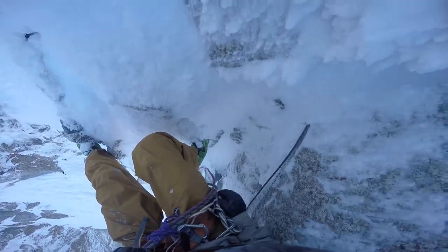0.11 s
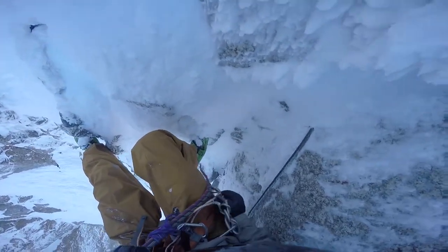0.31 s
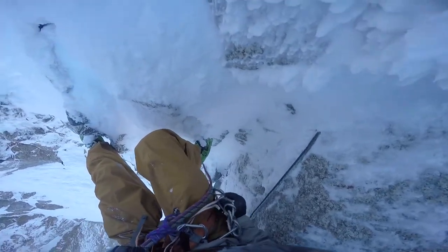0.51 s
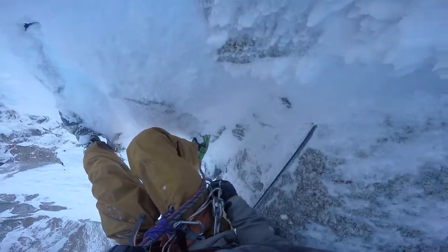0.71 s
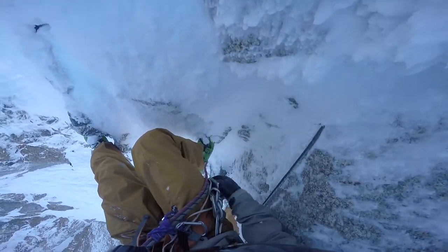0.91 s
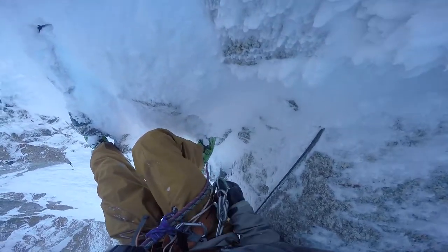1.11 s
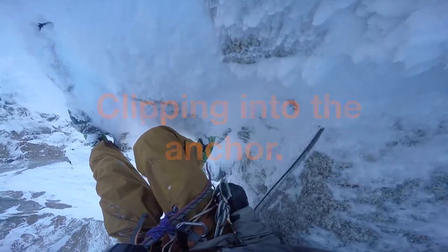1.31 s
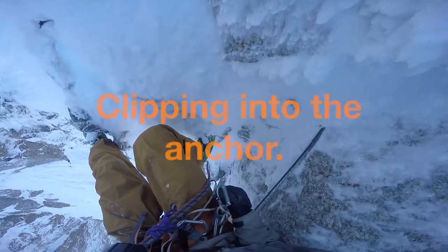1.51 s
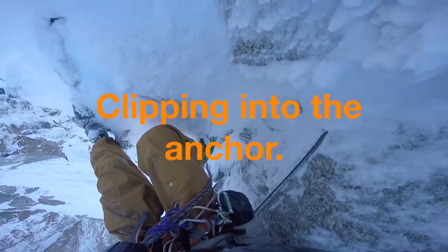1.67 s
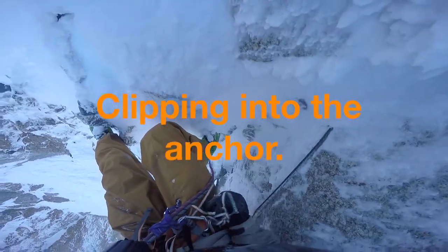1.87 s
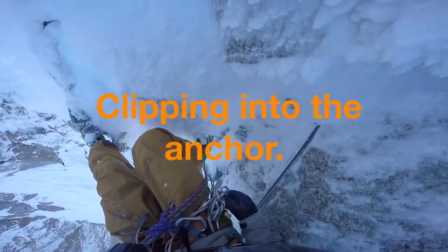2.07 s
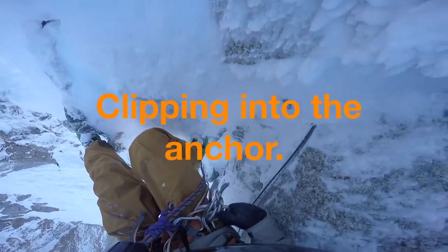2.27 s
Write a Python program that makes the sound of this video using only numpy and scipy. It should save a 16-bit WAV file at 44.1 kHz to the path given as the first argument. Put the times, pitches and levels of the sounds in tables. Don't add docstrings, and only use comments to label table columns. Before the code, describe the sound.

Two sharp, distorted blows strike a plastic camera case after a soft knock, with a low thump; then quiet cloth and snow rustle, ice chips tick and metal gear clinks, heard close on a climber's helmet outdoors.

```python
import sys
import numpy as np
from scipy import signal
from scipy.io import wavfile
from scipy.ndimage import uniform_filter1d

SR = 44100
rng = np.random.default_rng(int(sys.argv[2]) if len(sys.argv) > 2 else 0)


def nominal_scale(level):
    x = np.asarray(level, float) / 20
    return 10 ** x


def log_audio(samples):
    frames = np.atleast_2d(samples).T
    limited = np.clip(frames, -1, 1)
    pcm = np.round(limited * 32767).astype(np.int16)
    wavfile.write(sys.argv[1], SR, pcm)


N = 105840
T = np.arange(N) / SR

# start_s, peak_db, contact_s, hardness_hz, latch_db
BLOWS = [
    (0.2206, -13, 0.00084, 2000, -49.5),
    (0.2224, 2, 0.003, 4500, -18),
    (0.2548, -32, .002, 1962, -49),
    (0.2582, 9.5, .0025, 5586, -14.5),
]
# pitch_hz, level_db, fade_60db_s
CASE_TONES = [(542, -6.5, 0.013), (740, -14.5, 0.018), (974, -10, 0.023), (1245, -8.5, 0.026),
              (1500, -7, 0.022), (1750, -4.5, 0.025), (2082, -5, 0.0087), (2691, 5, 0.013),
              (3320, 0.5, 0.0056), (3786, 4.5, 0.0055), (5300, -0.5, 0.0017), (6530, 0, 0.0079),
              (7850, -6, 0.015), (12000, -6.5, 0.0062)]
# pitch_hz, level_db, fade_60db_s
LATCH_TONES = [(2000, -3, .045), (2261, -2, .04), (2850, -4, .026), (4535, 0, .036), (5800, -7, .03)]
# start_s, peak_db, hardness_hz
SOFT_KNOCKS = [
    (.0858, -26, 2400),
    (.0872, -11.5, 2400),
    (.0892, -19.5, 1960),
    (1.3275, -43, 3060),
    (1.9, -41.5, 2470),
    (1.9025, -34, 2000),
    (2.397, -53, 700),
]
# pitch_hz, level_db, fade_60db_s
SHELL_TONES = [(513, -14.5, 0.058), (766, -18.5, 0.045), (998, -4.5, 0.0334), (1270, 0, 0.029),
               (1580, -5, 0.012), (1635, 2, .02), (2002, -16.5, 0.017), (2362, -12.5, 0.018),
               (2560, 0.5, 0.019), (3400, -13.5, .012)]
# start_s, peak_db, hardness_hz
BUCKLE_TAPS = [
    (1.2566, -22.5, 7600),
    (1.2588, -22, 6400),
    (1.263, -30, 2800),
    (1.2685, -42, 1900),
]
# pitch_hz, level_db, fade_60db_s
BUCKLE_TONES = [(348, -12.5, 0.065), (830, -2, 0.028), (558, -33, 0.021), (1020, -2, 0.025),
                (1250, 15.5, 0.013), (1540, 1, 0.018), (1960, -2, 0.056), (2400, 12.5, 0.014),
                (2640, -24, 0.025), (3600, -33, .014)]
# pitch_hz, level_db, fade_60db_s
MOUNT_TONES = [(264, -30.5, 0.16), (2220, -28.5, .08), (3036, -39, 0.068), (600, -25, .03),
               (876, -28.5, 0.055), (1820, -30, .16), (2060, -29, 0.062)]
# start_s, peak_db, pitch_hz
HELMET_JOLTS = [
    (0.089, -35.5, 118.8),
    (1.319, -38.5, 54),
    (1.69, -41, 55),
    (1.831, -42.5, 96),
    (2.133, -42.5, 94),
]
# start_s, peak_db, pitch_hz, snap_db
ICE_CHIPS = [(0.616, -47, 3040, -8.5), (0.7735, -50, 2813, -7), (0.8317, -53, 3010, -12),
             (0.8474, -54, 2900, -18), (0.9613, -46.5, 3244, -12), (1.2378, -45, 2340, -7),
             (1.2814, -67, 4170, -1), (1.296, -47.5, 2480, 0.5), (1.443, -34, 2460, -23.5),
             (1.5445, -50.5, 5600, -12), (1.5458, -41, 2570, -29), (1.5706, -44.5, 4000, -25),
             (1.572, -45, 1670, -25.5), (1.596, -53, 1500, -25), (1.601, -41.5, 3400, -25),
             (1.61, -49.5, 6040, -8), (1.612, -42, 2570, -26), (1.6829, -41.5, 2260, -8.5),
             (1.853, -41.5, 2610, -14.5), (1.934, -40, 2570, -4), (2.0693, -40, 2730, -18.5),
             (0.006, -48, 1630, -28), (0.19, -50, 3200, -8.5), (2.051, -52, 5000, -12),
             (0.348, -58, 3000, -30), (0.426, -60, 3030, -30), (2.1405, -53, 4500, -27.5)]
# start_s, peak_db, pitch_hz, snap_db
ICE_SPLINTERS = [(1.1272, -39.5, 5210, 8), (1.1977, -53.5, 4480, 5.5), (1.2674, -69, 4260, -2),
                 (1.3588, -51, 3990, 9), (1.3852, -30, 3400, -24), (1.4102, -53, 3600, 5.5),
                 (1.425, -50.5, 4830, 6), (1.4704, -37.5, 3560, -3.5), (1.479, -45.5, 5060, -7.5),
                 (1.7116, -45.5, 5440, 5.5), (1.985, -39, 4440, 14), (1.9914, -41.5, 5250, 7),
                 (2.0574, -45.5, 4000, 10.5), (2.145, -45, 4200, -1.5)]
# start_s, peak_db, contact_s, hardness_hz
GEAR_CLINKS = [
    (1.745, -40, 0.0017, 13840),
    (1.9692, -24, 0.0015, 9000),
    (1.971, -22, 0.0018, 8600),
    (1.9765, -31, 0.0026, 4950),
    (2.224, -39.5, 0.0024, 8800),
    (2.2431, -35.5, 0.002, 9800),
    (2.2472, -50, 0.0023, 9000),
    (2.2937, -40, 0.00091, 15000),
    (2.3262, -42.5, 0.0055, 4700),
]
# pitch_hz, level_db, fade_60db_s
GEAR_TONES = [(1490, -4, 0.0036), (2570, -3.5, 0.032), (3213, 4.5, 0.0081), (4170, -9, 0.0089),
              (5250, -6, 0.01), (6500, 9.5, 0.0034), (7560, 3.5, 0.0032), (11130, 6.5, 0.0046),
              (12860, -1, 0.0045), (15240, -4.5, 0.012)]
# time_s, level_db
WEBBING_SLIDE = [(0, -57), (.07, -59.5), (.13, -60.5), (.2, -63.5), (.225, -100)]
# pitch_hz, width_hz, level_db
WEBBING_PEAKS = [(2943, 180, -1.5), (3450, 220, 1.5), (4400, 700, -2), (5600, 400, -9.5), (6900, 300, -9.5),
                 (7800, 250, -11)]
# time_s, level_db
SOLE_DRAG = [(2.12, -100), (2.16, -65), (2.2, -57.5), (2.26, -56.5), (2.31, -68.5), (2.39, -68.5)]
# pitch_hz, width_hz, level_db
SOLE_PEAKS = [(1350, 200, -5.5), (2400, 120, -0.5), (3300, 250, -1.5), (5400, 300, -7.5), (6750, 300, -14)]
# time_s, hiss_db, graininess_db
MOVEMENT = [(0, -59.5, -1), (.212, -62.5, -0.4), (.27, -77, -2), (.56, -81.5, -2), (.7, -71, 1),
            (.8, -70, 2), (.826, -77, 6), (.852, -63.5, 4), (.95, -72, 3.5), (1.1, -65, 1.5),
            (1.3, -65.5, 4.5), (1.45, -58.5, -1.5), (1.52, -64.5, 3.5), (1.61, -62.5, 3), (1.77, -63, -2),
            (1.86, -58, 1), (2.24, -59, 2.5), (2.4, -61.5, 2)]
# pitch_hz, level_db (per Hz)
HISS_COLOUR = [(150, -41), (250, -8.5), (1290, -8), (2020, -2.5), (2710, -6.5), (3630, -8), (5130, -9.5),
               (13000, -29), (15500, -35)]
# pitch_hz, width_hz, level_db
PORT_PEAKS = [(1360, 190, -5.5), (1930, 170, -9.5), (2870, 390, 13.5), (3120, 450, -3.5), (4900, 800, -7.5),
              (7300, 780, -15.5)]
# time_s, buffet_db, rumble_db, hum_db
WIND_LEVELS = [(0.0, -48.5, -64, -82), (0.12, -59, -58, -69.5), (0.25, -47.5, -68, -73.5),
               (0.29, -50.5, -62, -71), (0.41, -49.5, -68.5, -63.5), (0.63, -60.5, -78.5, -77.5),
               (0.76, -56, -76.5, -83), (0.91, -59.5, -77.5, -75), (1.16, -57, -69.5, -80),
               (1.34, -58, -61, -66.5), (1.5, -49, -59.5, -84), (1.68, -54.5, -83, -67.5),
               (1.8, -51.5, -55, -53.5), (1.94, -44, -63, -59.5), (2.1, -55.5, -67, -73),
               (2.25, -51.5, -61, -58.5), (2.4, -48.5, -59, -79)]

COVER_HZ, COVER_DB, COVER_T60_S = 2722.4, -5, 0.0092
THUMP_S, JOLT_CYCLES = .2594, 1.2
SWING_HZ, SWING_DB, SWING_TOP_S, SWING_S = 136, .5, .0052, .0078
HUM_HZ, HUM_DB, HUM_T60_S = 133, -14, .12
CHIP_S = 0.003
SELF_NOISE_DB, WHINE_HZ, WHINE_DB = -79.5, 12620, -85
HAZE_DB, HAZE_T60_S, HAZE_END_S = -68, 3.6, .484
SHUT_S, SHUT_DB, REOPEN_S = .265, -11, 0.29
CEILING, TOP_HZ = 1., 15050


def unit(x):
    return x / np.sqrt(np.mean(x ** 2))


def band(x, lo_hz, hi_hz, order=2):
    edges = [lo_hz, min(hi_hz, .45 * SR)]
    return signal.sosfilt(signal.butter(order, edges, "band", fs=SR, output="sos"), x + 1e-18)


def reson(x, hz, width_hz):
    return signal.lfilter(*signal.iirpeak(hz, hz / width_hz, fs=SR), x)


def ring(push, modes, scatter_db):
    luck = rng.standard_normal(len(modes))
    out = 0
    for (hz, db, t60), chance in zip(modes, luck):
        pole = np.exp((2j * np.pi * hz - np.log(1000) / t60) / SR)
        tone = signal.lfilter([1], [1, -pole], push + 1e-18).imag
        out = out + nominal_scale(db + scatter_db * chance) * tone
    return out


def contact(length_s, tail_s=0.00049, size=6000):
    t = np.arange(size) / SR
    fade = np.exp(-np.maximum(t - length_s, 0) / tail_s)
    return rng.standard_normal(size) * fade * np.minimum(t / 0.00015, 1)


def add(out, s, x, db):
    i = min(int(s * SR), N)
    out[i:i + len(x)] += (x * nominal_scale(db) / np.abs(x).max())[:N - i]


def walk(rate):
    k = int(SR / rate)
    steps = np.repeat(rng.standard_normal(N // k + 1), k)
    return 1.3 * uniform_filter1d(uniform_filter1d(steps, k), k)[:N]


def curve(table, axis):
    rows = np.array(table)
    return np.interp(T, rows[:, 0], rows[:, axis])


def knocks():
    out = np.zeros(N)
    tap = np.eye(1, 6000)[0]
    t = T[:len(tap)]
    for s, db, length_s, hard_hz, latch_db in BLOWS:
        push = band(contact(.5 * length_s, 0.5 * length_s), 0.2 * hard_hz, hard_hz)
        body = band(ring(push, CASE_TONES, 0.61), 380, 27000)
        add(out, s, body + nominal_scale(17.0) * push, db)
        swell = np.minimum(t / .0006, 1) * nominal_scale(-60 * np.maximum(t - length_s, 0) / COVER_T60_S)
        add(out, s, np.sin(2 * np.pi * COVER_HZ * t) * swell, db + COVER_DB)
        add(out, s + length_s, ring(tap, LATCH_TONES, 1.2), latch_db)
    return out


def taps():
    out = np.zeros(N)
    for hits, modes in ((SOFT_KNOCKS, SHELL_TONES), (BUCKLE_TAPS, BUCKLE_TONES)):
        for s, db, hard_hz in hits:
            touch = np.eye(1, 4000)[0] + .15 * contact(.0005, .001, size=4000)
            push = band(touch, .1 * hard_hz, hard_hz, order=1)
            add(out, s, ring(push, modes, 0.95), db)
    return out


def helmet():
    out, t = np.zeros(N), np.arange(12000) / SR
    for s, db, hz in HELMET_JOLTS:
        add(out, s, np.sin(2 * np.pi * hz * t) * np.exp(-(t * hz / JOLT_CYCLES) ** 2), db)
    bump = np.exp(-((t - SWING_TOP_S) / SWING_S) ** 2)
    add(out, THUMP_S, -np.sin(2 * np.pi * SWING_HZ * t) * bump, SWING_DB)
    add(out, THUMP_S, -np.sin(2 * np.pi * HUM_HZ * t) * nominal_scale(-60 * t / HUM_T60_S), HUM_DB)
    for hz, db, t60 in MOUNT_TONES:
        add(out, THUMP_S, np.sin(2 * np.pi * hz * t) * nominal_scale(-60 * t / t60), db)
    return out


def chips():
    out = np.zeros(N)
    for s, db, hz, snap_db in list(ICE_CHIPS) + list(ICE_SPLINTERS):
        push = contact(0.00031, CHIP_S, size=3000)
        body = band(reson(push, hz, 0.316 * hz) + 0.41 * push, 0.4 * hz, 1.3 * hz)
        snap = band(contact(0.00044, 0.0005, size=3000), 4300, 11100)
        add(out, s, unit(body) + nominal_scale(snap_db) * unit(snap), db)
    return out


def gear():
    out = np.zeros(N)
    for s, db, length_s, hard_hz in GEAR_CLINKS:
        touch = contact(1.6 * length_s, 0.2 * length_s, size=3000)
        push = band(touch, 0.37 * hard_hz, hard_hz, order=1)
        add(out, s, ring(push, GEAR_TONES, 2.5) + nominal_scale(18) * push, db)
    return out


def rub(table, peaks):
    out = 0
    for hz, width_hz, db in peaks:
        flicker_db = 2.0 * walk(25)
        once = reson(rng.standard_normal(N), hz, 1.5 * width_hz)
        twice = reson(once, hz, 1.5 * width_hz)
        out = out + nominal_scale(db + flicker_db) * unit(twice)
    return unit(out) * nominal_scale(curve(table, axis=1))


def rustle():
    grain_db = np.clip(curve(MOVEMENT, axis=2), 0, 2.6)
    sizes = rng.exponential(1, N // 40 + 1).repeat(40)[:N]
    sizes = uniform_filter1d(sizes, size=30)
    grain_level = nominal_scale(grain_db * (np.minimum(sizes, 4) - 1))

    def grains():
        return rng.standard_normal(N) * grain_level

    colour, shared, hiss = np.array(HISS_COLOUR), walk(30), 0
    for hz in 280 * 2 ** np.arange(0, 5.9, .5):
        db = np.interp(np.log(hz), np.log(colour[:, 0]), colour[:, 1]) + 10 * np.log10(hz)
        flicker_db = 1.2 * shared + 1.2 * walk(30)
        hiss = hiss + nominal_scale(db + flicker_db) * unit(band(grains(), hz / 1.25, hz * 1.25))
    ports = 0
    for hz, width_hz, db in PORT_PEAKS:
        ports = ports + nominal_scale(db + 2.2 * walk(18)) * reson(grains(), hz, width_hz)
    return unit(unit(hiss) + nominal_scale(-2.5) * unit(ports)) * nominal_scale(curve(MOVEMENT, axis=1))


def wind():
    buffet = band(rng.standard_normal(N), 8, 30, order=3) * nominal_scale(1.5 * walk(10))
    flutter = nominal_scale(2.6 * walk(14))
    rumble = unit(band(rng.standard_normal(N), 42, 110, order=3))
    rumble = rumble * nominal_scale(curve(WIND_LEVELS, axis=2) + 2.0)
    hum = unit(reson(reson(rng.standard_normal(N), 132, 51), 132, 51))
    hum = hum * nominal_scale(curve(WIND_LEVELS, axis=3))
    return unit(buffet) * nominal_scale(curve(WIND_LEVELS, axis=1) + 9.0) + (rumble + hum) * flutter


def circuit():
    hiss = nominal_scale(SELF_NOISE_DB) * unit(band(rng.standard_normal(N), 200, 14000, order=1))
    wobble = unit(reson(rng.standard_normal(N), WHINE_HZ, 60))
    whine = nominal_scale(WHINE_DB) * (np.sin(2 * np.pi * WHINE_HZ * T) + .4 * wobble)
    after = T > SHUT_S
    shut = np.where(after, np.clip(1 - (T - HAZE_END_S - .06) / REOPEN_S, 0, 1), 0)
    haze = unit(band(rng.standard_normal(N), 150, 4100, order=1))
    haze = haze * nominal_scale(HAZE_DB - 60 * (T - SHUT_S) / HAZE_T60_S)
    haze_gate = after * np.clip((HAZE_END_S - T) / 0.0091, 0, 1)
    return (hiss + whine) * nominal_scale(SHUT_DB * shut) + haze * haze_gate


def scene():
    rubs = rub(WEBBING_SLIDE, WEBBING_PEAKS) + rub(SOLE_DRAG, SOLE_PEAKS)
    strikes = knocks() + taps() + helmet() + chips() + gear()
    return (strikes + rustle() + rubs + wind())[None]


def low_pass(x):
    return signal.sosfilt(signal.butter(12, 16660, fs=SR, output="sos"), x)


def record(dry):
    top_cut = signal.ellip(8, .2, 70, TOP_HZ, fs=SR, output="sos")
    x = signal.sosfilt(top_cut, dry + circuit())
    clipped = np.clip(x, -CEILING, CEILING)
    mix = signal.lfilter(*signal.butter(2, 16500, fs=SR), clipped)
    return low_pass(mix)


dry = scene()
out = record(dry)
log_audio(out)
```